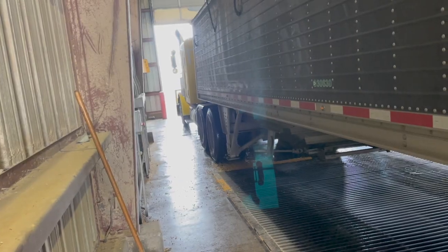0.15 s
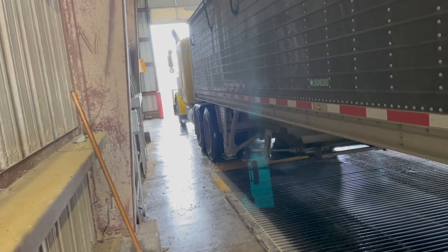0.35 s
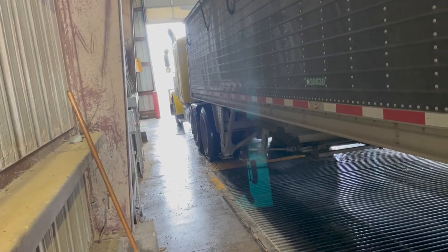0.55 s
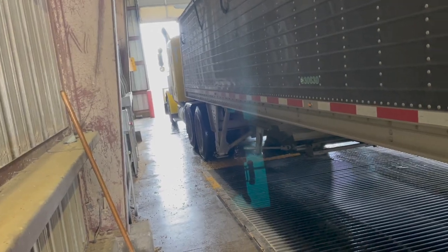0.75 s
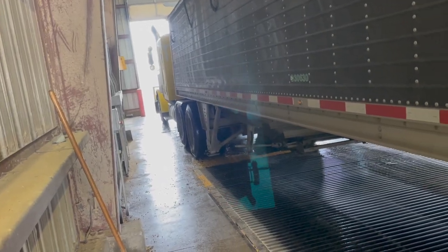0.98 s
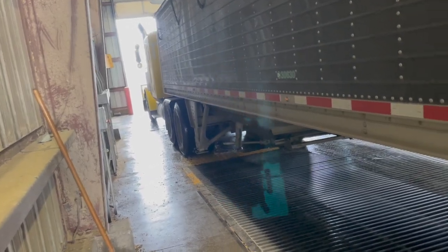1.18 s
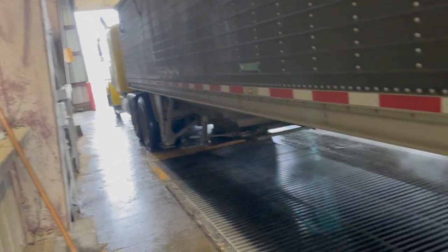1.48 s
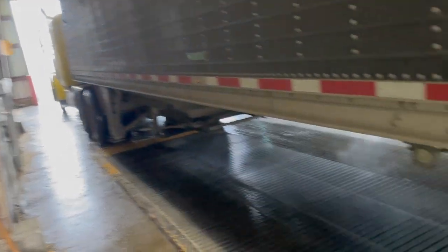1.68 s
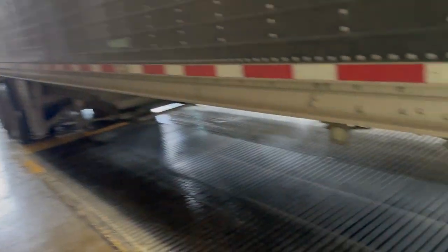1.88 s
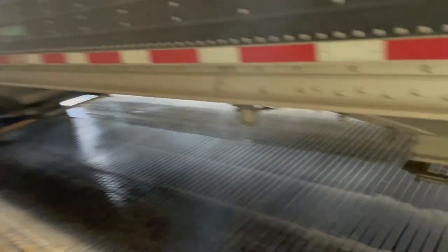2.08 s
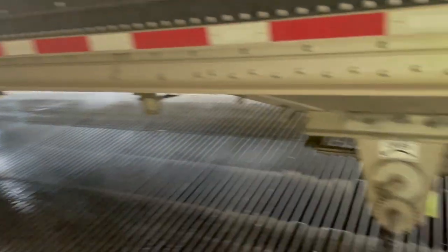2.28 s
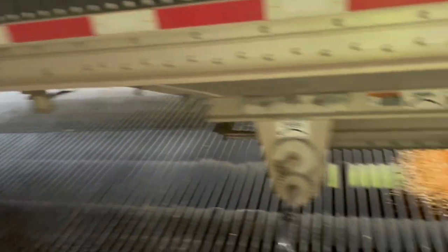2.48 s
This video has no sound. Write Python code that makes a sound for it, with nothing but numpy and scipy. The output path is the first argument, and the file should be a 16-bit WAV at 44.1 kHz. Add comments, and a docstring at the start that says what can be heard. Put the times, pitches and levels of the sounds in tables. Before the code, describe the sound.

Constant rushing hiss of falling grain kernels, with a wavering motor hum and surging low rumble beneath

```python
"""Shelled grain pours from a trailer gate through a steel grate in a drive-through shed.
From the start countless random kernel ticks merge into a hiss, over the surging low noise of
pit machinery and a motor hum made of a wavering sine and its fourth harmonic.
From about one second on, the middle colour of the hiss changes and then its treble, as the
listening position turns toward the stream; the hum's phase lead shrinks with the turn."""
import sys
import numpy as np
from scipy import signal
from scipy.io import wavfile
from scipy.ndimage import uniform_filter1d

SR = 44100
rng = np.random.default_rng(int(sys.argv[2]) if len(sys.argv) > 2 else 0)


def dump_mix(stems):
    """Bounce the given channels to the path in sys.argv[1] as a 16-bit WAV at rate SR."""
    frames = np.atleast_2d(stems).T  # one column per channel
    limited = np.clip(frames, -1, 1)  # hard clip at full scale
    pcm = np.round(limited * 32767).astype(np.int16)
    wavfile.write(sys.argv[1], SR, pcm)


N = 116865
FRAME = 1024  # samples per spectral frame, unless a source asks for another size


def gain_of(db):
    """Decibel law: amplitude ratio of a level difference."""
    return 10 ** (np.asarray(db) / 20)


def evened(x):
    """Normalization to unit rms over the whole array."""
    return x / np.sqrt(np.mean(abs(x) ** 2) + 1e-20)


def by_hz(table, hz, axis=1):
    """Interpolation of one table column on a logarithmic frequency axis."""
    table = np.array(table)
    log_hz = np.log(table[:, 0] + 1)
    return np.interp(np.log(hz + 1), log_hz, table[:, axis])[:, None]


def spectra(x, size=FRAME):
    """Short-time Fourier analysis with frames overlapping by three quarters."""
    return signal.stft(x, SR, nperseg=size, noverlap=size - size // 4)


def drift(top_hz):
    """Random modulation: slow sines at random phase, weaker when faster, summed to unit rms."""
    t = np.arange(N) / SR
    rates_hz = np.geomspace(.4, top_hz, num=20)
    waves = (np.sin(2 * np.pi * (f * t + rng.random())) / np.sqrt(f) for f in rates_hz)
    return evened(sum(waves))


# Stereo likeness, left phase lead and balance by frequency:
# wide mids, antiphase near 9 kHz, mono above 12 kHz
# frequency_hz, likeness (0-1), left_lead_rad, left_minus_right_db
STEREO_IMAGE = [(50, .999, 0, .1), (85, .994, 0, .3), (135, .89, 0, 1), (200, .86, 0, -.3),
                (300, .88, 0, .8), (430, .76, .2, 1.7), (700, .18, -.5, 1.7), (1400, .42, -1.9, 1.6),
                (2200, .3, -.8, 1.6), (3200, .42, .7, 3.3), (4900, .36, .8, 4.3), (5500, .1, -1, 2.7),
                (6000, .43, -1.5, 2.5), (6600, .44, -.3, .7), (7200, .19, -2.9, .2), (7600, .75, -3, .2),
                (8150, .78, -3, 0), (8350, .95, -3.14, 0), (9400, .96, -3.14, 0), (10200, .67, -3.8, 0),
                (10900, .46, -5.1, 0), (11400, .8, -6.1, 0), (11900, .97, -6.25, 0), (12700, 1, -6.283, 0)]


def stereo(hz, z, shift_db, size=FRAME):
    """Partial coherence: two independent fields mix into left and right with a lead and a balance."""
    same = np.clip(by_hz(STEREO_IMAGE, hz), 0, 1)
    lead = np.exp(-1j * by_hz(STEREO_IMAGE, hz, axis=2))
    lean = gain_of((by_hz(STEREO_IMAGE, hz, axis=3) - shift_db) / 2)
    right = same * z[0] * lead + np.sqrt(1 - same ** 2) * z[1]
    pair = np.array([z[0] * lean, right / lean])
    return signal.istft(pair, SR, nperseg=size, noverlap=size - size // 4)[1][:, :N]


# Colour of the kernel hiss before the turn: frequency_hz, relative_level_db
HISS_COLOUR = [(250, -17.5), (500, -0.5), (680, 0.1), (800, 2.5), (970, 5), (1400, 1.4), (1800, -2.5),
               (2150, -3), (2700, -1.1), (3250, 0), (3550, -0.5), (3900, 1.5), (4400, -0.4), (5100, 0.4),
               (5550, -1.5), (6000, -0.2), (6350, 0.5), (6700, 1.3), (7300, 1.3), (8300, 1.2), (9300, -4),
               (10200, 4.5), (11500, 0), (13500, 3.5), (14800, 2.5), (15700, 1.7)]
# Turn toward the stream: time_s, share (0-1)
TURN_PATH = [(0, 0), (1.4, 0), (1.75, .26), (2.05, 0.6), (2.35, 1), (2.65, 1)]
# What the full turn changes in the hiss: frequency_hz, gain_db, shift_to_right_db
FACING_CHANGE = [(300, 0, 0), (950, -1.1, 0), (1300, -.2, .5), (1900, -.1, .3), (2400, 1.5, .3),
                 (3000, 2.8, .3), (3500, .6, .6), (3900, -.3, 1.4), (4700, -.1, 2), (6500, 1.3, 2.2),
                 (7600, 2, .5), (9400, 3.5, 0), (11200, .7, 0), (14000, -.4, 0)]
HISS_DB = -21  # rms over both channels
KERNELS_PER_S, KERNEL_SPREAD_DB = 36000, 1.15  # rate in each field, random spread of tick size
PATCHY_DB, PATCHY_FROM_HZ = 1.4, 2000  # rms clumping of the hiss, heard above this frequency
MIDS_LEAD_S, MIDS_TOP_HZ = 0.45, 4200  # the middle colour changes this much sooner than the treble


def kernels():
    """Shot noise: ticks of random size and sign, so dense that they fuse into hiss."""
    hits = rng.random((2, N)) < KERNELS_PER_S / SR
    sizes = gain_of(KERNEL_SPREAD_DB * rng.standard_normal((2, N)))
    ticks = hits * rng.standard_normal((2, N)) * sizes
    hz, t, z = spectra(ticks)
    # clumps: chance levels smoothed over neighbouring frequencies, then over time
    patches = uniform_filter1d(rng.standard_normal(z.shape[1:]), size=14, axis=0)
    patches = evened(uniform_filter1d(patches, size=8, axis=1))
    patches_db = PATCHY_DB * patches / (1 + (PATCHY_FROM_HZ / (hz[:, None] + 1)) ** 2)
    lead_s = MIDS_LEAD_S / (1 + (hz[:, None] / MIDS_TOP_HZ) ** 4)
    turn = np.interp(t + lead_s, *np.transpose(TURN_PATH))
    colour_db = by_hz(HISS_COLOUR, hz) + turn * by_hz(FACING_CHANGE, hz)
    z = z * gain_of(colour_db + patches_db)
    shift_db = turn * by_hz(FACING_CHANGE, hz, axis=2)
    return gain_of(HISS_DB) * evened(stereo(hz, z, shift_db))


# Colour of the pit rumble: frequency_hz, relative_level_db
RUMBLE_COLOUR = [(20, -36), (35, -13), (57, 0.5), (90, 0.5), (112, -10.5), (145, -9.5), (200, -9.5),
                 (300, -13.5), (450, -16), (600, -30), (1200, -38)]
# Surges of the rumble; the mean depth sets its level, the body gives only swings about its mean:
# time_s, depth_db, body_db
RUMBLE_SURGE = [(0.0, -30.5, -35), (0.15, -29, -34.5), (0.16, -25, -31.5), (0.36, -31, -34.5),
                (0.38, -26, -35.5), (0.53, -21.5, -30), (0.62, -31, -34), (0.74, -23, -33),
                (0.84, -36, -31), (0.88, -26.5, -32.5), (1.0, -35.5, -31), (1.03, -23.5, -35),
                (1.2, -30.5, -32), (1.25, -25, -36), (1.27, -28.5, -30.5), (1.39, -38.5, -37.5),
                (1.42, -24.5, -35), (1.7, -33.5, -32.5), (1.75, -28.5, -34), (2.23, -30.5, -32.5),
                (2.37, -24, -31.5), (2.38, -35, -36), (2.62, -29.5, -34), (2.65, -34, -34)]
SURGE_REACH_HZ, BODY_FROM_HZ = 126, 91  # depth swings act below the first, body swings above the second
STEADIED = 0.57  # share of the deep rumble's chance fading that is evened out


def rumble():
    """Filtered noise: low roar of conveyor and fans under the grate, depth and body swelling apart."""
    hz, t, z = spectra(rng.standard_normal((2, N)), size=4096)
    s, deep_db, body_db = np.transpose(RUMBLE_SURGE)
    deep_db, body_db = np.interp(t, s, deep_db), np.interp(t, s, body_db)
    z = z * gain_of(by_hz(RUMBLE_COLOUR, hz))
    deep = 1 / (1 + (hz[:, None] / SURGE_REACH_HZ) ** 4)
    body = 1 / (1 + (BODY_FROM_HZ / (hz[:, None] + 1)) ** 4)
    # level of the noise's own chance fading in the deep band
    deep_power = (deep * abs(z[0]) ** 2).sum(axis=0)
    fading_db = 10 * np.log10(deep_power + 1e-20)
    steadying_db = STEADIED * (fading_db - fading_db.mean())
    deep_swing_db = deep_db - deep_db.mean() - steadying_db
    body_swing_db = body_db - body_db.mean()
    z = z * gain_of(deep * deep_swing_db + body * body_swing_db)
    return gain_of(deep_db.mean() + 3.0) * evened(stereo(hz, z, 0, size=4096))


# Level of the hum's fundamental before waver and balance: time_s, level_db (rms)
HUM_LEVEL = [(0.0, -35), (0.05, -37), (0.16, -28.5), (0.61, -30), (0.78, -32.5), (0.94, -27.5), (1.11, -34),
             (1.68, -29.5), (1.73, -33), (1.79, -30), (2.46, -31), (2.51, -30), (2.56, -36), (2.65, -34)]
HUM_HZ, FOURTH_DB = 119.25, -21  # fundamental, and fourth harmonic relative to it
HUM_WAVER_DB, HUM_WANDER_RAD = 0.77, 0.57  # rms drift of level and of phase
HUM_LEAD_RAD, HUM_LEAD_LOST = .45, .6  # left phase lead before the turn, share lost by its end


def hum():
    """Harmonic tone of a motor: it swells, sags and wavers, its phase leading on the left."""
    t = np.arange(N) / SR
    level_db = np.interp(t, *np.transpose(HUM_LEVEL)) + HUM_WAVER_DB * drift(11)
    level = np.sqrt(2) * gain_of(level_db)  # rms to peak
    right_phase = 2 * np.pi * (HUM_HZ * t + rng.random()) + HUM_WANDER_RAD * drift(2.68)
    turn = np.interp(t, *np.transpose(TURN_PATH))
    left_phase = right_phase + HUM_LEAD_RAD * (1 - HUM_LEAD_LOST * turn)
    phases = np.array([left_phase, right_phase])
    fourth = gain_of(FOURTH_DB) * np.sin(4 * phases)
    balance = gain_of([[.9], [-.9]])  # dB, left and right
    return level * (np.sin(phases) + fourth) * balance


def scene():
    """Superposition of the hiss, the rumble and the hum."""
    return kernels() + rumble() + hum()


def record(dry):
    """Band limitation: a linear-phase low-pass filter at 15750 Hz."""
    low_pass = signal.firwin(1023, 15750, window=("kaiser", 9), fs=SR)
    return signal.oaconvolve(dry, low_pass[None], "same")


dry = scene()
out = record(dry)
dump_mix(out)
```